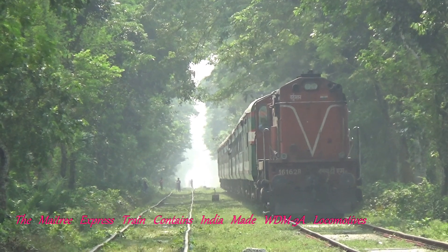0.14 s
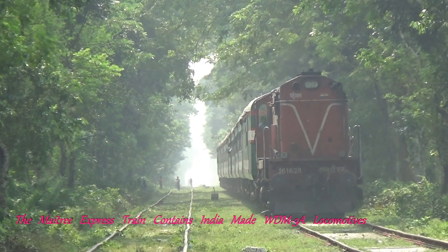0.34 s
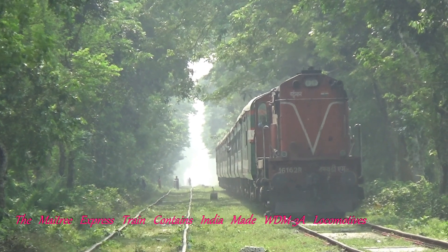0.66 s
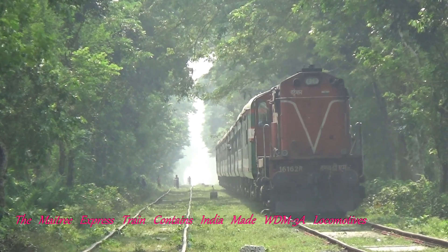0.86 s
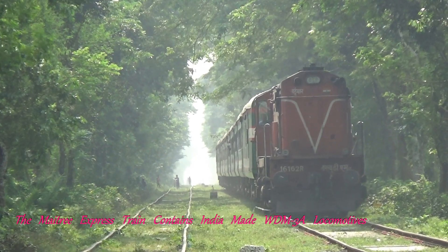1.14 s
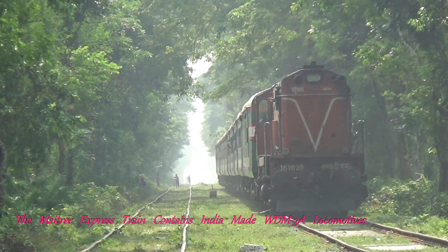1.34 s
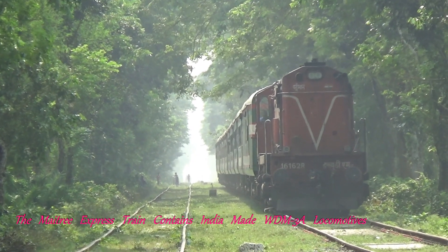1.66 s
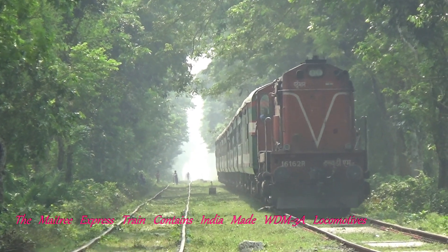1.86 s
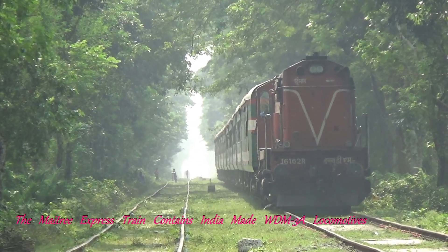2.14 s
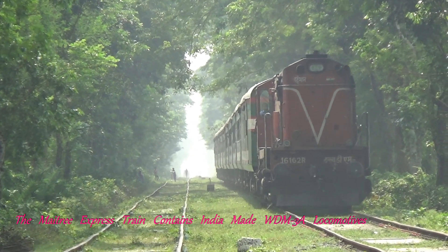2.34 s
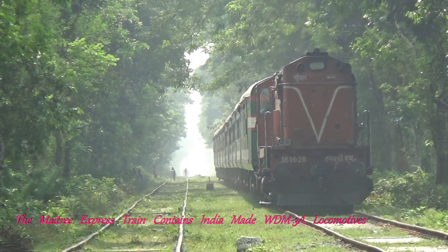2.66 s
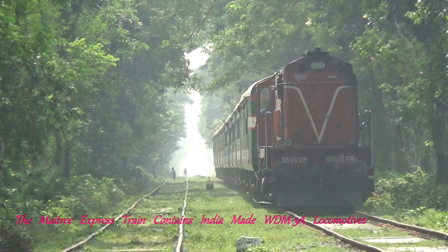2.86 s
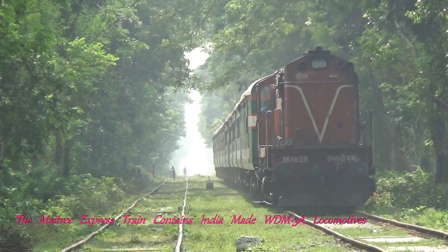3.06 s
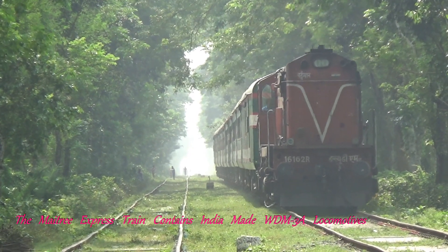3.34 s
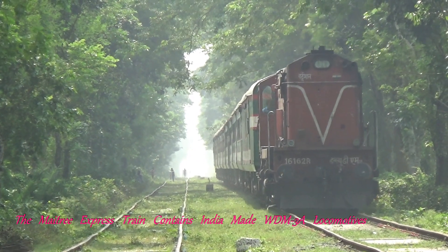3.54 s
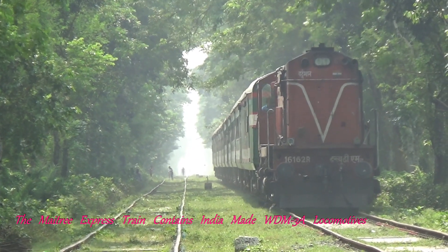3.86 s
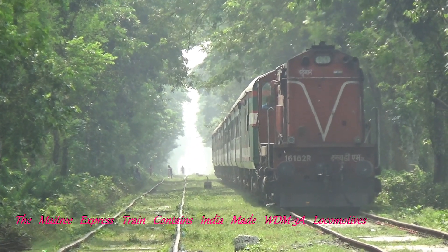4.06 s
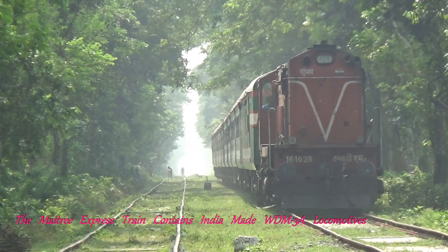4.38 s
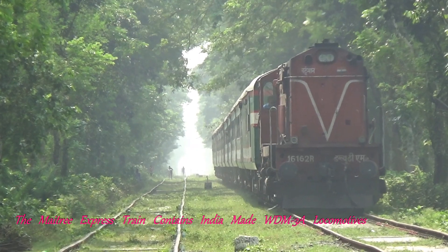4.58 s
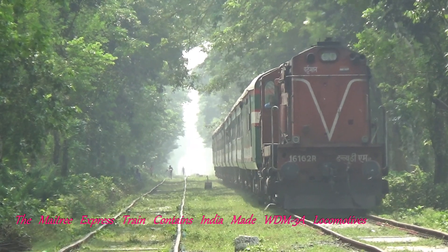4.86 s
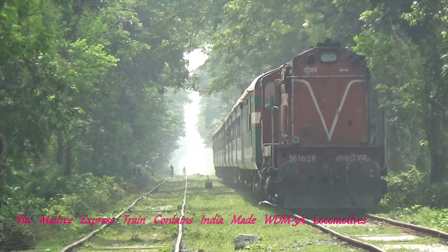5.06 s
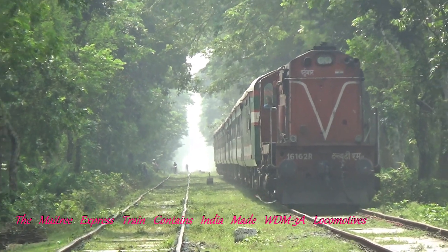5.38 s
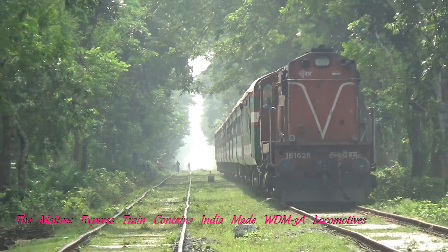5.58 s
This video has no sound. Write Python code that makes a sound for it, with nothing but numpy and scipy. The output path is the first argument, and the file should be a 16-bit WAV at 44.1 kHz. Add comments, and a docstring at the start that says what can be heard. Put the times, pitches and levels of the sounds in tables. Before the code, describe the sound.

Some way ahead of the microphone among trees, a slow diesel locomotive rumbles steadily with a rush of machinery, an even rattling knock and a faint wavering whine. A small bird keeps up a thin two-note chirp, with other birds and shrill insects faintly behind it. One dry click sounds close by early on, and three more follow in the last two seconds, the final one sharpest.

```python
"""Diesel locomotive in dense forest

A sixteen-cylinder locomotive creeps toward the microphone from about forty metres off. Its exhaust
throbs, the machinery rushes, a compressor knocks at a steady beat and a gear whines faintly.
In the trees a small bird repeats a two-note chirp over shrill insects and more distant birds.
Trunks and leaves scatter the sound; a few sharp, dry clicks come from right by the microphone."""
import sys
import numpy as np
from scipy import signal
from scipy.fft import rfft, irfft
from scipy.io import wavfile
from scipy.ndimage import uniform_filter1d

SR = 44100
rng = np.random.default_rng(int(sys.argv[2]) if len(sys.argv) > 2 else 0)


def store_wav(level_fs):
    """Save 16-bit WAV to argv[1]."""
    pcm = np.round(np.clip(np.atleast_2d(level_fs), -1, 1) * 32767)
    wavfile.write(sys.argv[1], SR, pcm.T.astype(np.int16))


N = 252252

START_M, SPEED_M_S = 41, 1.47  # the locomotive's first distance and its pace
CYLINDERS, FIRING_HZ = 16, 76.2
RUMBLE_DB, MACHINERY_DB, KNOCK_DB = -61.5, -54.5, -55  # at the starting distance
FIRST_STROKE_S, STROKE_S, STROKE_SCATTER_DB = 0.2037, .3006, 1  # the compressor's beat
CRICKET_DB, CRICKET_TIRES_S, CRICKET_FADE_DB_PER_S = -76, 2.9, 4
LEAD_HZ, CHIRP_DELAY_S = 4765, .0535  # top pitch of the bird's lead-in note; the chirp follows it
REPEAT_S, REPEAT_FALL_HZ, REPEAT_DB = .08, 220, -3  # a repeated chirp is lower and softer
FOREST_T60_S = 0.71

# resonances of the exhaust stack and car body: centre_hz, width_hz, gain_db
STACK_RESONANCES = [(54.2, 16, 6), (99.6, 21.3, 4), (155.8, 59, -4), (225, 49, -1), (269.8, 14, -4)]
# boom at the firing rate: time_s, level_db
BOOM_LEVELS = [(0.0, -62), (0.22, -53), (0.54, -65), (0.68, -53.5), (1.05, -59), (1.1, -55.5), (1.51, -60),
               (2.61, -57), (2.88, -51.5), (3.1, -61), (3.18, -54), (4.05, -54.5), (4.13, -63),
               (4.24, -54.5), (4.73, -57), (4.81, -52.5), (5.69, -61.5), (5.72, -67)]
# spectrum of the machinery and rolling noise: frequency_hz, gain_db
MACHINERY_SPECTRUM = [(30, -4), (150, 3.5), (400, -4), (530, 2), (680, 0), (800, 1.5), (930, -1),
                      (1090, 1.5), (1350, -5.5), (1800, -3), (3600, -8.5), (4700, -9.5), (6200, -17),
                      (15800, -29.5)]
# rise and fall of the gear whine: time_s, level_db
WHINE_LEVELS = [(0, -76), (.33, -69), (.6, -82), (1.8, -74), (2.0, -61.5), (2.6, -63.5), (3.3, -70),
                (4.1, -75), (4.25, -60), (4.65, -68.5), (4.97, -57.5), (5.72, -71)]
# high hiss of the forest air: frequency_hz, gain_db
AIR_SPECTRUM = [(2000, -24), (7000, -1.5), (11000, -4.5), (15800, -6)]
# spectrum of a compressor knock: frequency_hz, gain_db
KNOCK_SPECTRUM = [(300, -25), (800, 3), (1350, 8), (2100, 2.5), (3200, 3), (5500, -4.5), (9000, -19),
                  (15000, -49)]
# strokes that knock harder than the rest: time_s, extra_db
HARD_STROKES = [(.81, 3.5), (1.71, 2.5), (2.91, 4.5), (4.72, 1.5)]
# the small bird's calls: start_s, lead_db, chirp_count, chirp_top_hz, chirp_db
SMALL_BIRD_CALLS = [(0.299, -54, 1, 4276, -44.5), (.751, -58.5, 1, 4370, -49), (1.194, -52.5, 1, 4310, -43),
                    (1.641, -57.5, 0, 4300, -48), (1.998, -53.5, 1, 4435, -47),
                    (2.438, -54, 1, 4330, -45.5), (2.899, -54, 1, 4350, -47),
                    (3.373, -57.5, 1, 4360, -48.5), (3.798, -53.5, 1, 4300, -44.5),
                    (4.238, -54, 2, 4386, -44.5), (4.798, -52.5, 1, 4430, -46.5),
                    (5.258, -56, 1, 4330, -48), (5.705, -53.5, 0, 4300, -48)]
# other birds' whistles, one list a call: time_s, pitch_hz, level_db
WHISTLE_GLIDES = [
    [(1.02, 4000, -55), (1.045, 3510, -53.5), (1.08, 3390, -54), (1.09, 3980, -53), (1.13, 3400, -64)],
    [(1.47, 2300, -56), (1.53, 1876, -52), (1.58, 1610, -56)],
    [(1.745, 7050, -66), (1.76, 6600, -60), (1.782, 5770, -66)],
    [(2.505, 5180, -61), (2.565, 6850, -64), (2.595, 7070, -63), (2.63, 6980, -66), (2.67, 6450, -60),
     (2.705, 5800, -64)],
    [(2.77, 3100, -63), (2.86, 2300, -62)],
    [(3.27, 2450, -58), (3.33, 2800, -60)],
]
# clicks by the microphone: start_s, level_db, ring_hz, ring_db, tilt_db_per_octave, top_db
CLOSE_CLICKS = [(1.4115, -27, 1920, 7.5, 2, -2), (4.044, -33, 2480, -1, 1.5, -10),
                (4.047, -21, 2210, -7, -1.5, -15), (4.647, -38, 2590, -7, -2.5, -10),
                (4.655, -41, 5500, -3, 1.5, -11), (5.3574, -22.5, 3220, 0, 2, -2),
                (5.3661, -13, 5100, -2, 2, 0.5), (5.3686, -26, 2670, 6, -1.5, -5)]
# spectrum of a click: frequency_hz, gain_db
CLICK_SPECTRUM = [(300, -34), (600, -12), (900, -4), (2500, -1), (5400, -2), (7000, -8.5), (9600, -1),
                  (11500, -12.5), (14500, -14), (16500, -7)]
# stereo width of the scattered sound: frequency_hz, side_db
SCATTER_WIDTH = [(100, -59), (350, -18), (1000, -14.5), (2000, -17.5), (3000, -28.5), (4300, -21.5),
                 (8500, -30.5), (14000, -31)]


def undb(db):
    """Decibels to gain."""
    return 10 ** (np.asarray(db) / 20)


def unit(x):
    """Scale to rms 1."""
    return x / np.sqrt(np.mean(x ** 2))


def curve(table):
    """A table of times and values, drawn out to one value a sample."""
    return np.interp(np.arange(N) / SR, *np.transpose(table))


def sine(pitch_hz):
    """A tone that follows a changing pitch."""
    return np.sin(2 * np.pi * np.cumsum(pitch_hz) / SR)


def add(track, start_s, sound):
    """Mix a sound into a track at a time."""
    start = int(np.clip(start_s * SR, 0, N - 1))
    track[start:start + len(sound)] += sound[:N - start]


def colour(x, points):
    """Filter by a spectrum of (frequency_hz, gain_db) points."""
    hz, db = np.transpose(points)
    bins = np.fft.rfftfreq(len(x), 1 / SR) + 1
    return irfft(rfft(x) * undb(np.interp(np.log(bins), np.log(hz), db)), len(x))


def resonate(x, hz, width_hz):
    """A steep resonance: two band-passes with gain 1 at the centre."""
    b, a = signal.iirpeak(hz, hz / width_hz, fs=SR)
    return signal.lfilter(b, a, signal.lfilter(b, a, x))


def noise_band(hz, width_hz):
    """Noise in one resonance, rms 1."""
    return unit(resonate(rng.standard_normal(N), hz, width_hz))


def drift(rate_hz):
    """Smooth random wander, rms 1."""
    hold = int(SR / rate_hz)
    steps = np.repeat(rng.standard_normal(N // hold + 1), hold)
    return unit(uniform_filter1d(uniform_filter1d(steps, hold), hold)[:N])


def forest(x, wet_db, build_s):
    """Direct sound plus scatter from trunks and leaves, which builds up and dies away."""
    t = np.arange(SR) / SR
    tail = rng.standard_normal(SR) * (1 - np.exp(-t / build_s)) * undb(-60 * t / FOREST_T60_S)
    return x + undb(wet_db) * signal.fftconvolve(x, tail / np.linalg.norm(tail))[:N]


def foliage(x, wet_db, smear_s):
    """Leaves around a bird briefly smear its notes."""
    t = np.arange(SR // 8) / SR
    paths = rng.standard_normal(len(t)) * t * np.exp(-t / smear_s)
    return x + undb(wet_db) * signal.fftconvolve(x, paths / np.linalg.norm(paths))[:N]


def exhaust(nearness, surge_db=1.0, octave_db=-26, jitter_s=0.0015):
    """Unequal cylinders puff in turn into the stack; the firing rate itself booms."""
    firings = np.cumsum(FIRING_HZ * (1 + .002 * drift(4.77))) / SR
    fired_at = np.flatnonzero(np.diff(np.floor(firings)) > 0)
    count = len(fired_at)
    cylinder_db = 7 * rng.permutation(np.linspace(-1, 1, CYLINDERS))
    puff_db = cylinder_db[np.arange(count) % CYLINDERS] + 3.5 * rng.standard_normal(N)[:count]
    late = (jitter_s * SR * rng.random(count)).astype(int)
    puffs = np.zeros(N)
    puffs[np.minimum(fired_at + late, N - 1)] = undb(puff_db)
    gas = unit(puffs) + 0.77 * rng.standard_normal(N)
    stack = sum(undb(db) * resonate(gas, hz, width) for hz, width, db in STACK_RESONANCES)
    octave = np.sin(4 * np.pi * firings) * undb(octave_db + 2.9 * drift(5))
    boom = (np.sin(2 * np.pi * firings) + octave) * undb(0.4 * drift(15))
    rumble = unit(stack) * undb(RUMBLE_DB + surge_db * drift(7))
    return unit(boom) * undb(curve(BOOM_LEVELS)) + nearness * rumble


def low_hum(pitch_hz=52.8, level_db=-69):
    """A low, wavering hum, perhaps the radiator fan."""
    return sine(pitch_hz * (1 + 0.016 * drift(6))) * undb(level_db + 1.5 * drift(4))


def machinery():
    """Valve gear, fans and wheels: a rush that wavers as a whole and flutters in its lower range."""
    rush = colour(rng.standard_normal(N), MACHINERY_SPECTRUM)
    low = signal.sosfilt(signal.butter(2, 1500, fs=SR, output="sos"), rush)
    flutter = 0.098 * drift(21.86) * low
    return unit(rush + flutter) * undb(MACHINERY_DB + 0.62 * drift(18))


def gear_whine(hz=555.7, octave_db=-8, howl_db=-68):
    """A gear tone and its octave, blurred by many paths through the trees, and a soft fan howl."""
    tone = unit(sine(hz * (1 + 0.002504 * drift(12))))
    gear = 0.86 * tone + 0.28 * noise_band(hz, 14) + undb(octave_db) * noise_band(2 * hz, 50)
    howl = sum(noise_band(fan_hz, 45) * undb(2 * drift(5.17)) for fan_hz in (777, 830, 1042, 1098))
    return undb(curve(WHINE_LEVELS)) * gear + undb(howl_db) * unit(howl)


def forest_air(level_db=-71):
    """A faint, high hiss among the trees."""
    return undb(level_db) * unit(colour(rng.standard_normal(N), AIR_SPECTRUM))


def insects(pulse_hz=9.5, trill_db=-79.5, chorus_db=-73):
    """A pulsing cricket that tires, a steady trill and a high chorus."""
    tired_s = np.maximum(np.arange(N) / SR - CRICKET_TIRES_S, 0)
    pulses = (1 + sine(pulse_hz * (1 + 0.036 * drift(2.5)))) / 2
    cricket = unit(pulses * noise_band(8230, 220)) * undb(CRICKET_DB - CRICKET_FADE_DB_PER_S * tired_s)
    trill = noise_band(7930, 170) * undb(trill_db + 1.6 * drift(17))
    chorus = noise_band(10280, 950) * undb(chorus_db + .8 * drift(12))
    return cricket + trill + chorus


def compressor(rise_s=0.0073, decay_s=0.021, ring_db=-9, clunk_db=-61):
    """Each stroke shakes loose metal into a short, faintly ringing rattle; hard ones clunk more."""
    rattles, clunks = np.zeros(N), np.zeros(N)
    t = np.arange(SR // 4) / SR
    stroke = (1 - np.exp(-t / rise_s)) * np.exp(-t / decay_s)
    stroke /= stroke.max()
    for start_s, chance in zip(np.arange(FIRST_STROKE_S, N / SR, STROKE_S), rng.standard_normal(N)):
        accent_db = sum(db for time_s, db in HARD_STROKES if abs(time_s - start_s) < STROKE_S / 2)
        add(rattles, start_s, undb(KNOCK_DB + accent_db + STROKE_SCATTER_DB * chance) * stroke)
        add(clunks, start_s, undb(clunk_db + 2 * accent_db) * stroke ** 2)
    metal = unit(colour(rng.standard_normal(N), KNOCK_SPECTRUM)) + undb(ring_db) * noise_band(1300, 200)
    knocks = rattles * metal + clunks * noise_band(hz=1100, width_hz=1100)
    return forest(knocks, wet_db=-4.5, build_s=0.013)


def locomotive():
    """Down the track: rumble, hum, rush and knocks grow as it nears; boom and whine go their own way."""
    nearness = START_M / (START_M - SPEED_M_S * np.arange(N) / SR)
    hum = low_hum()
    return exhaust(nearness) + nearness * (hum + machinery() + compressor()) + gear_whine()


def chirps(notes, length_s, sweep, crest, octave_db, waver):
    """Each note flicks up to its top pitch at the share `crest` of its length; there its octave sounds."""
    track = np.zeros(N)
    progress = np.linspace(0, 1, int(length_s * SR))
    glide = 1 - sweep * (1 - progress / crest) ** 2
    swell = signal.windows.tukey(len(progress), .35) * (1 - .5 * progress)
    octave = undb(octave_db - 134 * (1 - glide))
    for start_s, top_hz, db in notes:
        wobble = 1 + waver * np.interp(progress, np.linspace(0, 1, 6), rng.standard_normal(6))
        pitch_hz = top_hz * glide * wobble
        add(track, start_s, undb(db) * swell * (sine(pitch_hz) + octave * sine(2 * pitch_hz)))
    return track


def small_bird():
    """A thin lead-in note, then the full chirp, which carries far between the trunks."""
    lead_notes = [(start_s, LEAD_HZ, lead_db) for start_s, lead_db, *_ in SMALL_BIRD_CALLS]
    full_notes = [(start_s + CHIRP_DELAY_S + k * REPEAT_S, hz - k * REPEAT_FALL_HZ, db + k * REPEAT_DB)
                  for start_s, _, count, hz, db in SMALL_BIRD_CALLS for k in range(count)]
    lead = chirps(lead_notes, length_s=0.0125, sweep=0.129, crest=0.736, octave_db=5.2, waver=.024)
    chirp = chirps(full_notes, length_s=0.02015, sweep=0.195, crest=0.61, octave_db=-8, waver=0.014)
    smeared_lead = foliage(lead, wet_db=-1, smear_s=0.007)
    return forest(smeared_lead, wet_db=-2.5, build_s=.01) + forest(chirp, wet_db=2, build_s=0.015)


def far_birds(count=22, level_db=-63.5):
    """Faint chatter deep in the trees; only its scatter reaches the microphone."""
    notes = [(when * N / SR, 1500 + 1900 * height, level_db + 6 * strength)
             for when, height, strength in rng.random((count, 3))]
    calls = chirps(notes, length_s=0.0396, sweep=0.197, crest=0.618, octave_db=-16, waver=0.039)
    scatter = foliage(calls, wet_db=0.5, smear_s=0.0046) - calls
    return forest(scatter, wet_db=-4.5, build_s=.02)


def whistling_birds():
    """Gliding calls from further off; the lower ones are hoarse and arrive through the leaves."""
    track = np.zeros(N)
    for call in WHISTLE_GLIDES:
        times_s, hz, db = np.transpose(call)
        t = np.arange(times_s[0], times_s[-1], 1 / SR)
        hoarseness = .03 if hz[0] < 4500 else .005
        glide_hz = uniform_filter1d(np.interp(t, times_s, hz), size=500)
        pitch_hz = glide_hz * (1 + hoarseness * drift(300)[:len(t)])
        swell = undb(np.interp(t, times_s, db)) * signal.windows.tukey(len(t), .2)
        add(track, times_s[0], swell * sine(pitch_hz))
    low = colour(track, [(4200, 0), (5200, -40)])
    clear_highs = undb(1) * (track - low)
    smeared_lows = undb(-11.5) * foliage(low, wet_db=10, smear_s=0.0022)
    return forest(clear_highs + smeared_lows, wet_db=-7, build_s=0.017)


def burst(envelope, points):
    """A noise burst with the energy of its envelope and a colour that holds from hit to hit."""
    spectrum = rfft(rng.standard_normal(len(envelope)) * envelope)
    even = spectrum / np.sqrt(uniform_filter1d(np.abs(spectrum) ** 2, size=40))
    sound = colour(irfft(even), points)
    return sound * np.linalg.norm(envelope) / np.linalg.norm(sound)


def clicks(crack_s=0.00055, buzz_s=0.0027, buzz_db=-8, ring_s=.001, lead_s=.002):
    """Small hard snaps by the microphone: a crack, one damped ring and a few milliseconds of buzz."""
    track = np.zeros(N)
    t = np.maximum(np.arange(2048) / SR - lead_s, 0)
    attack = 1 - np.exp(-t / 0.00011)
    envelope = attack * (np.exp(-t / crack_s) + undb(buzz_db) * np.exp(-t / buzz_s))
    for start_s, level_db, ring_hz, ring_db, tilt, top_db in CLOSE_CLICKS:
        spectrum = [(hz, db + tilt * np.log2(hz) + top_db * np.clip(hz / 7000 - 1, 0, 1))
                    for hz, db in CLICK_SPECTRUM]
        ring = undb(ring_db) * np.sin(2 * np.pi * ring_hz * t) * np.exp(-t / ring_s)
        add(track, start_s - lead_s, undb(level_db) * (burst(envelope, spectrum) + attack * ring))
    return signal.sosfilt(signal.butter(5, 660, "high", fs=SR, output="sos"), track)


def scene():
    """All lies nearly straight ahead of a stereo microphone; scatter and close clicks give width."""
    air = forest_air()
    distant = locomotive() + small_bird() + whistling_birds() + far_birds() + air
    close = clicks()
    scatter = colour(forest(distant, wet_db=-4, build_s=0.003) - distant, SCATTER_WIDTH)
    # the clicks reach the two capsules slightly out of step
    quarter_cycle = np.imag(signal.hilbert(close))
    skew = colour(quarter_cycle, [(1000, -16), (2000, -12), (4500, -20), (9000, -23), (14000, -27)])
    side = (scatter + skew) * np.array([[1], [-1]])
    return distant + insects() + close + side


def record(dry):
    """The microphone drops the deepest bass and cuts the top."""
    bass_cut = signal.butter(2, 34, "high", fs=SR, output="sos")
    top_cut = signal.ellip(10, .1, 70, 15750, fs=SR, output="sos")
    return signal.sosfilt(top_cut, signal.sosfilt(bass_cut, dry))


dry = scene()
out = record(dry)
store_wav(out)
```